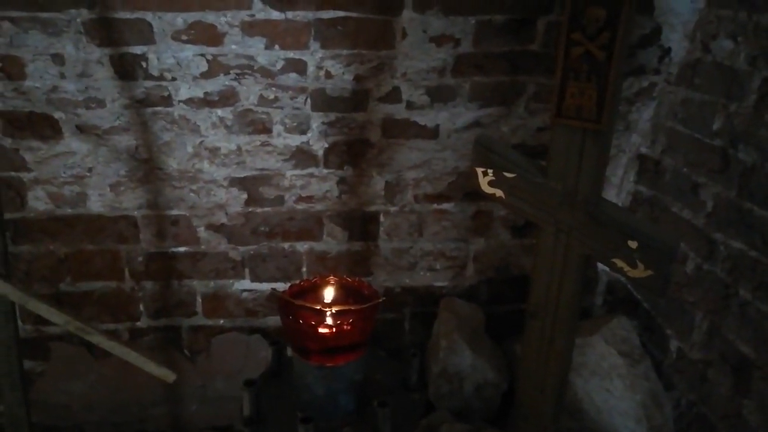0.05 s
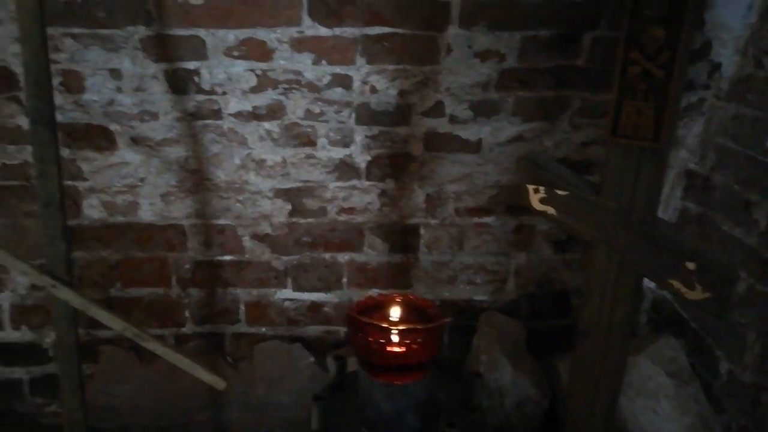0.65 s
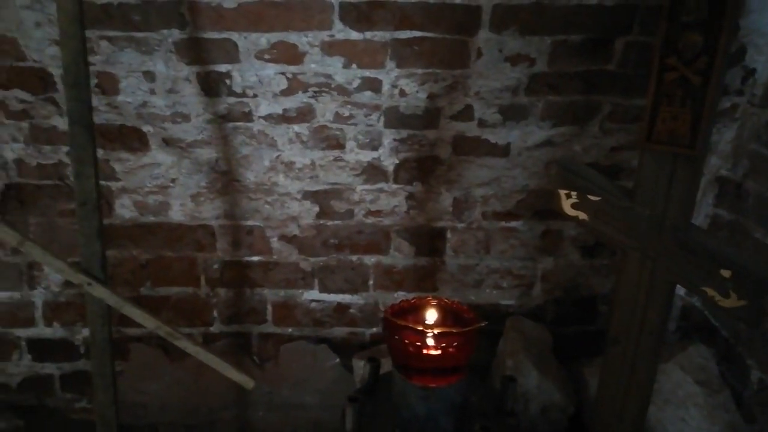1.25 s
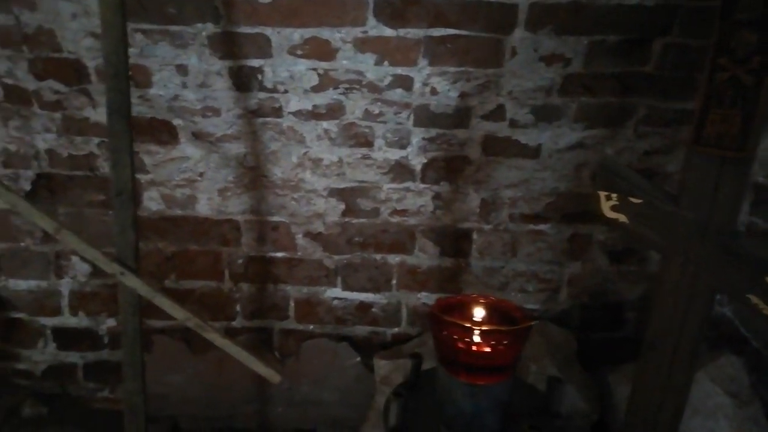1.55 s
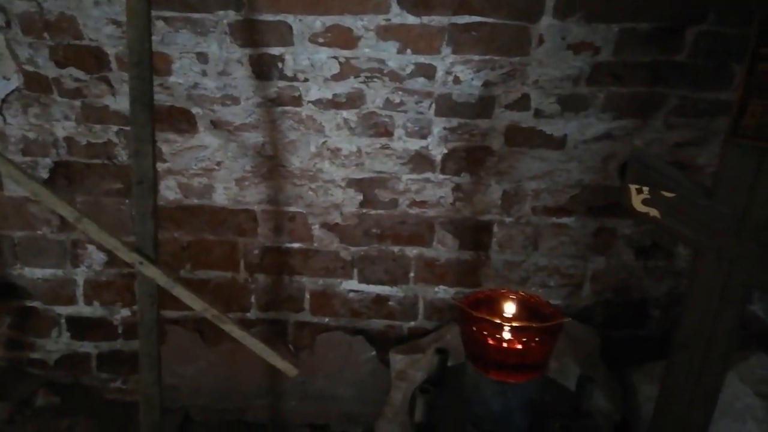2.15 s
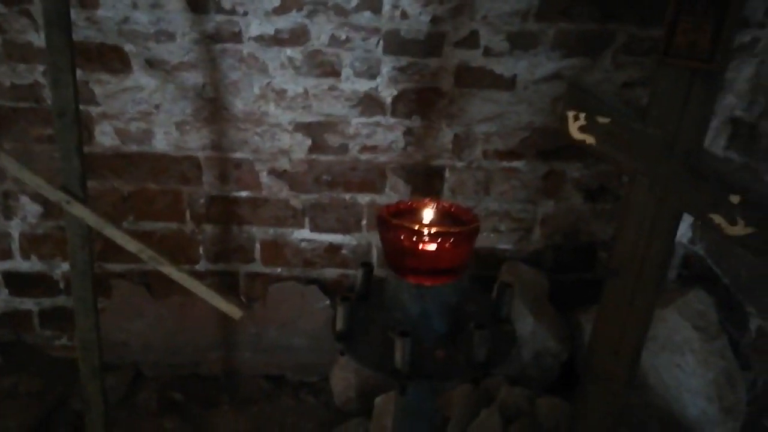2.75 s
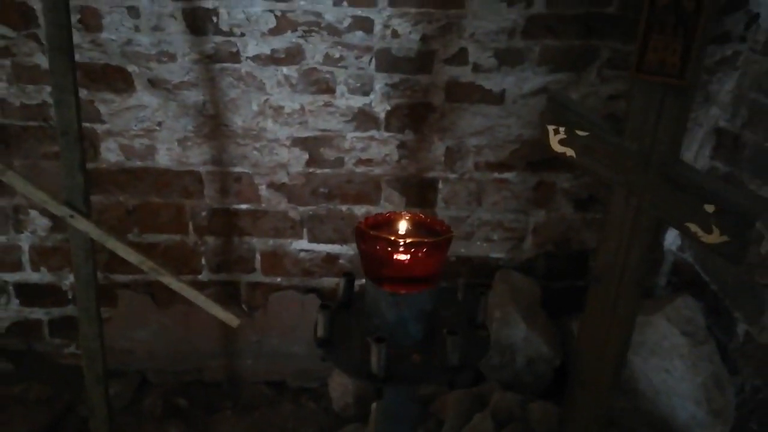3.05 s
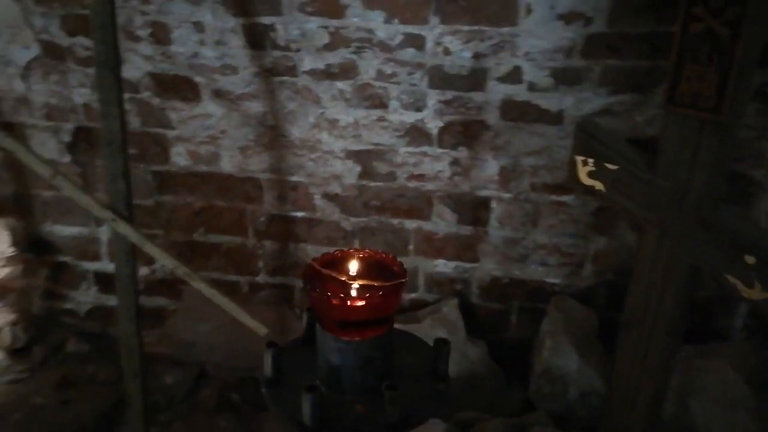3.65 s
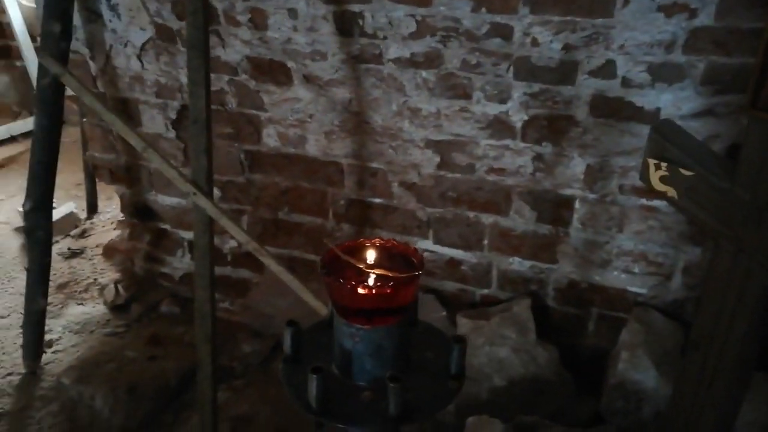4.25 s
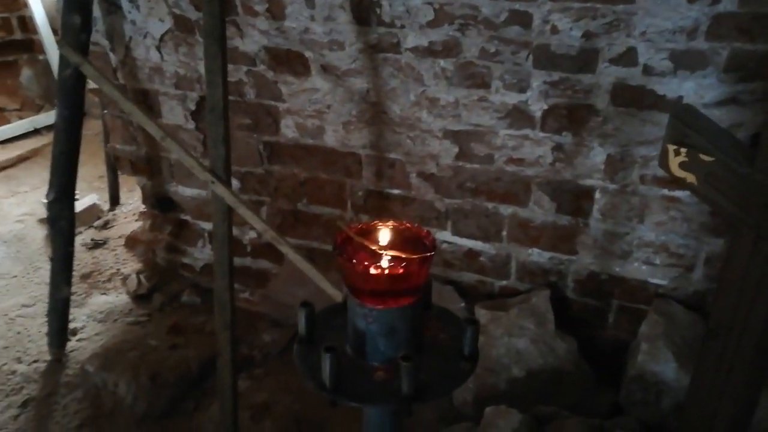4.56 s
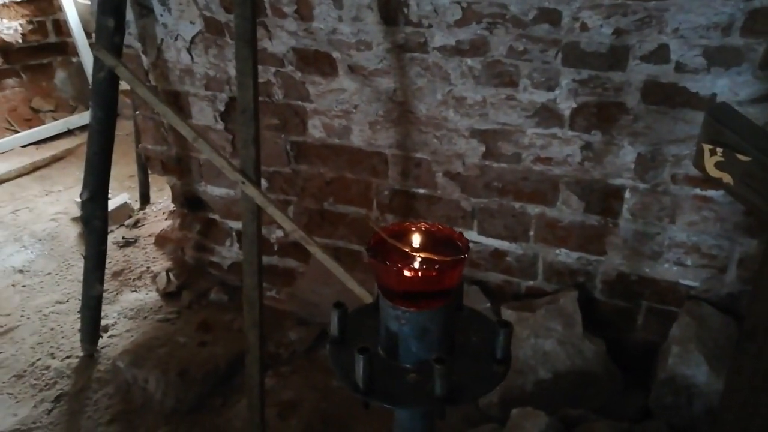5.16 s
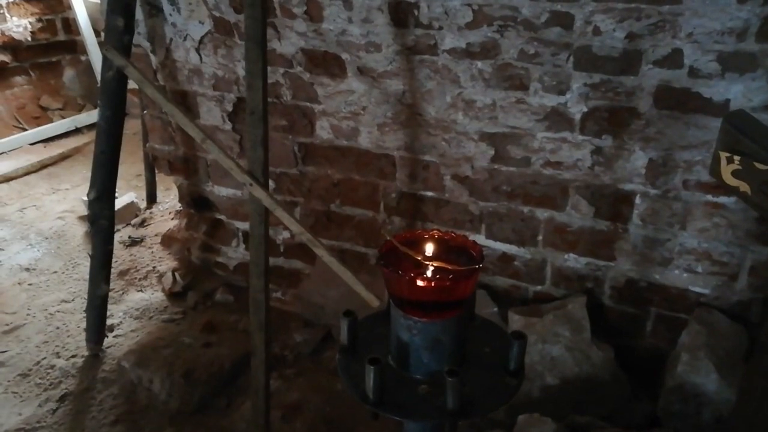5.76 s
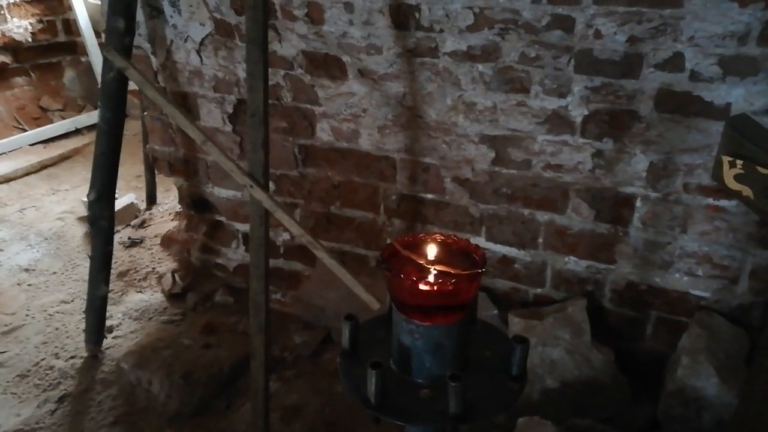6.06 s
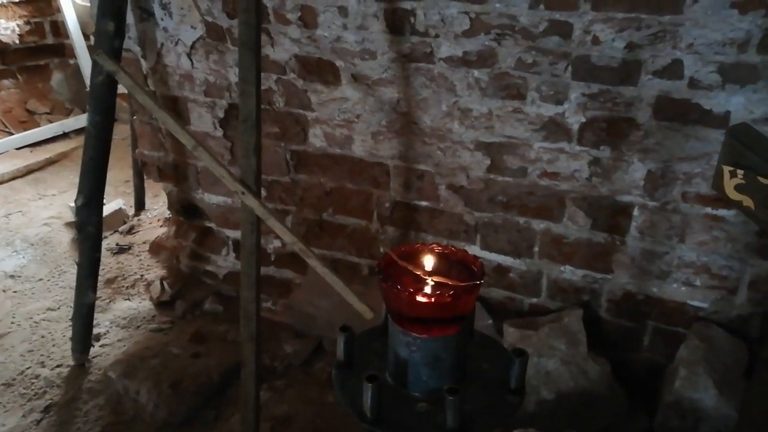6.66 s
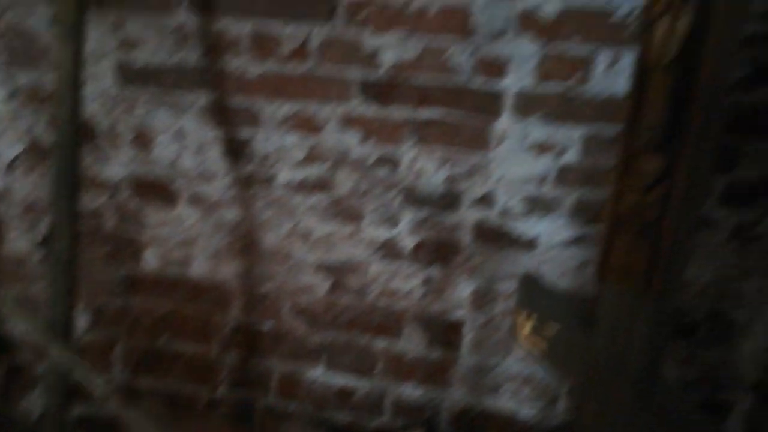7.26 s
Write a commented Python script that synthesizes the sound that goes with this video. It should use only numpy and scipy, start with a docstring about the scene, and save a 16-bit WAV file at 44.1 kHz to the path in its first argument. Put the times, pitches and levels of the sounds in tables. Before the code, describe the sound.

Close to the microphone, the damp wick of an oil lamp fries with fine, bright crackling and irregular tiny pops. A couple of soft hisses rise in the first half. Later the crackle breaks into quick clusters of ticks as the steady sizzle weakens, with one louder snap shortly before the end. The small indoor space is otherwise still, with only a faint rumble.

```python
"""A sputtering oil lamp

A small oil lamp burns in a glass cup by a brick wall. Moisture in the wick boils off: first a dense sizzle with
a thin jet of steam, then more separate sputters as the wick dries. Larger bubbles burst in sharp pops
throughout. The cup and the wall echo every tick, and a low rumble surges at the start, then murmurs faintly
underneath."""
import sys
import numpy as np
from scipy import signal
from scipy.io import wavfile
from scipy.ndimage import map_coordinates

SR = 44100
rng = np.random.default_rng(int(sys.argv[2]) if len(sys.argv) > 2 else 0)


def store_wav(level_fs):
    """Save 16-bit WAV to argv[1]."""
    pcm = np.round(np.clip(np.atleast_2d(level_fs), -1, 1) * 32767)
    wavfile.write(sys.argv[1], SR, pcm.T.astype(np.int16))


N = 322371
TIME = np.arange(N) / SR

# Levels in the tables are relative. A tick's "body" is a boost to its lower frequencies.
# steady boiling of the wick: time_s, level_db
SIZZLE_LEVEL = [(0, -46.5), (0.3, -51.0), (0.55, -47.5), (0.75, -50.5), (0.93, -50), (1.4, -50.5),
                (1.62, -47.5), (1.92, -51.5), (2.05, -48.5), (2.22, -53.5), (2.58, -52), (2.75, -52),
                (2.99, -58), (3.09, -53), (3.28, -54.5), (3.5, -55.5), (3.95, -55.5), (4.3, -53),
                (4.5, -63), (4.8, -59), (5.1, -63), (5.27, -51.5), (5.55, -57), (5.9, -55), (6.1, -59.5),
                (6.43, -53), (6.56, -56.5), (6.85, -58.5), (7.03, -57), (7.31, -58.5)]
# the largest bubbles bursting: time_s, level_db, body_db
BUBBLE_POPS = [(0.0214, -15, -6), (0.0542, -17, 0), (0.0795, -14, 6), (0.0979, -14, 5), (0.1337, -15, 9),
               (0.1697, -12.5, 5), (0.2362, -10.5, 2.5), (0.2591, -14, -5), (0.295, -15, 2),
               (0.3558, -12, -16), (0.3638, -13, -12), (0.4502, -12.5, -11), (0.471, -12.5, -2),
               (0.5288, -16, -1), (0.6179, -20, 5), (0.624, -16, -3), (0.6668, -18.5, 1),
               (0.7096, -19.5, 9.5), (0.7255, -20, 8), (0.81, -13, -2), (0.8248, -11.5, -9),
               (0.8966, -11.5, -10), (0.9107, -16, 3), (0.9168, -14, 1), (0.9388, -12, -11),
               (1.0014, -16.5, 4.5), (1.096, -17.5, 4), (1.1051, -28, 6), (1.1214, -14, -11),
               (1.1684, -18, -5), (1.1775, -21, -4), (1.1845, -24, 9), (1.2275, -24, 13), (1.3029, -22, 12),
               (1.3143, -22.5, 11), (1.403, -19, -3), (1.5121, -14.5, 5), (1.554, -18, 5),
               (1.6134, -13.5, 3), (1.742, -18, 2), (1.7535, -11, -4), (1.8799, -20.5, 12),
               (1.8948, -16.5, 4.5), (1.9216, -16.5, 4), (1.978, -11, -19), (1.9923, -13, -8),
               (2.0018, -11, -5), (2.032, -15, -15), (2.0452, -16, 6), (2.0893, -11, -11),
               (2.1052, -17, -10), (2.1543, -13, -6), (2.307, -16.5, 5), (2.3112, -16, 9.5),
               (2.402, -20, 7), (2.4795, -18, -3), (2.4932, -16.5, 2), (2.5172, -16.5, -4),
               (2.532, -19.0, 4), (2.5796, -15.0, 0), (2.599, -10.5, -4), (2.6144, -13, -4.0),
               (2.8654, -20, 11), (3.036, -17, 0), (3.051, -17, 2), (3.0616, -17, -2), (3.208, -16.5, 2.5),
               (3.483, -15, 0), (3.4892, -19.5, 2), (3.5252, -13, 1), (3.5308, -13.5, 3),
               (3.5907, -14, -4.5), (3.6135, -14, -19), (3.654, -13, -6.0), (3.6661, -17, 2),
               (3.7188, -16, -3.5), (3.8435, -14.5, -1), (3.928, -16.5, 1.5), (4.0128, -13, -9),
               (4.058, -14.5, -2), (4.1968, -16, -11), (4.212, -9.5, -8), (4.2811, -13, -3),
               (4.3153, -22, -1), (4.326, -11.5, 0.5), (4.3787, -14, -3), (4.4902, -19, -6),
               (4.5883, -11, -13), (4.6356, -11.5, -4.5), (4.6682, -9.5, -2), (4.6964, -13.5, 0.5),
               (4.7642, -17, -11), (4.9605, -19, 1), (5.0036, -16.5, -0.5), (5.0531, -18, 6),
               (5.1083, -21.5, -2), (5.256, -14, -2), (5.2905, -13, -2), (5.438, -19.5, 6),
               (5.4718, -16, -12), (5.648, -15.5, -4.5), (5.855, -16, 1.5), (5.8833, -16, 1),
               (5.905, -15, -10), (5.952, -11.5, -5.5), (6.18, -18.0, 2), (6.21, -20, 3),
               (6.2498, -21, 8.5), (6.2948, -11.5, -5.5), (6.304, -15, -10), (6.346, -19, -9),
               (6.4838, -13.5, 3), (6.6186, -21, 5.5), (6.6462, -18.5, 3), (6.6914, -3.5, 2),
               (6.7759, -18.5, 3.5), (6.8929, -11.5, 0), (7.104, -17.5, 5), (7.1169, -18.5, 5),
               (7.18, -14.5, -3.5)]
# volleys of tiny bursts: middle_s, level_db, body_db
VOLLEYS = [(0.957, -17, -3), (2.249, -25, 7), (2.546, -16, 1), (2.972, -17, 1), (3.022, -19, 0),
           (3.132, -19, -2), (3.354, -17.5, -6), (3.386, -22.5, 2.5), (3.451, -17, -0.5), (3.54, -21, -3.5),
           (3.56, -17.5, -10), (3.759, -20, -4), (3.863, -19.5, -2.5), (4.393, -15, -4.5),
           (4.425, -19, -0.5), (4.486, -19, -5), (4.512, -14, -3), (4.534, -20, -10.0), (4.565, -16.5, -6),
           (4.668, -10, -3.5), (4.697, -19, -3), (4.74, -16.5, -3.5), (4.79, -18.5, 0.5),
           (4.825, -19, -3.5), (4.897, -18.5, -4), (4.964, -18.5, -5), (5.051, -18.5, -1),
           (5.11, -22.5, -0.5), (5.14, -21, -8), (5.187, -18, -1.5), (5.292, -19.5, -10),
           (5.324, -14, -1.5), (5.359, -15.5, -3.5), (5.437, -22, 4.5), (5.48, -25, 4), (5.57, -20, 0),
           (5.682, -19, -0.5), (5.729, -17.5, -4), (5.812, -23.5, 1), (5.83, -21, 2.5), (6.003, -18.5, 0),
           (6.091, -19.5, -22), (6.18, -23.5, 2.5), (6.347, -22.5, -12), (6.409, -19, -4), (6.443, -13, -8),
           (6.579, -17.5, -16.5), (6.69, -20, 1.5), (6.731, -18, -0.5), (6.778, -17.5, -1.5),
           (6.797, -21.5, 2.5), (6.829, -16.5, -5), (6.908, -19.5, -3), (6.95, -19.5, -1.5),
           (7.004, -19.5, -5), (7.03, -22.5, -1), (7.126, -22, -4), (7.182, -19, -4), (7.24, -19.5, 1.5),
           (7.298, -22.5, 1.5)]
# high hiss (steam spurts, and a brighter top to the sizzle midway): peak_s, level_db, pitch_hz
HISS_SWELLS = [(.4, -52, 9000), (1.2, -64, 9900), (2.42, -50.5, 9000), (2.9, -64, 9500), (3.7, -64, 11800),
               (4.25, -63, 11700), (7.2, -64, 9500)]
# faint whistles of the steam: middle_s, level_db, half_length_s
STEAM_WHISTLES = [(2.07, -64.5, .08), (2.56, -62, .08)]
# tone of a tick leaving the cup, from the wet wick and the dry one: frequency_hz, level_db
WET_TONE = [(150, -9), (550, -11), (900, -7.5), (2750, -3), (3300, -4.5), (4900, -6.5), (5700, -2.5),
            (6450, 1.5), (7400, 4), (8200, -3), (9200, 4), (10400, 4), (11500, -2), (12900, -11.5),
            (15500, -10.5)]
DRY_TONE = [(150, -13), (600, -15.5), (1100, -9), (2300, -6.5), (3300, -9.5), (4900, -11), (5700, -7.5),
            (6400, -3), (8400, -3), (10500, 0), (11700, -5.5), (13000, -17.5), (15500, -15)]
# the highest treble of the ticks rises and falls: time_s, gain_db
TICK_EDGE = [(0, -5), (.6, -2), (2.6, 0), (3.3, -0.5), (3.55, 0), (4.4, 1.5), (4.7, -0.5), (5.05, 3),
             (5.3, -1.5), (5.9, 2.5), (6.7, -1.5), (7.31, -2.5)]
# a narrow, high ring in the sizzle: time_s, gain_db
HIGH_RING = [(0, -28), (.5, -22), (.7, 0), (.9, -16), (1.5, -10), (2.4, -14.5), (4.0, -18), (4.27, 2),
             (4.55, -20), (6, -16.5), (6.45, -2.5), (7.31, -15.5)]
# notes at which the air in the cup and its corner rings: pitch_hz, width_hz, gain_db
CUP_NOTES = [(650, 53, -7), (1072, 23, 0.5), (1770, 21, 0), (2780, 280, -8), (3820, 660, -7)]
# where the lamp lies as the listener sways: time_s, rightward_degrees
LAMP_DIRECTION = [(0, -9), (.4, -7.5), (1.2, -1), (2.05, 4), (3.8, -8), (5.2, -3), (6.9, -1.5), (7.2, -8)]
# tone of the quiet air and of the low rumble: frequency_hz, level_db
AIR_TONE = [(28, 0), (48, -3), (66, -4.5), (95, -11), (140, -2), (210, -6), (320, -9), (500, -17.5),
            (1000, -19.5), (4000, -20), (16000, -26.5)]
RUMBLE_TONE = [(12, 3), (26, 1.5), (44, 7), (65, -28), (95, -15), (140, -8), (280, -20.5), (500, -46.5),
               (1500, -29.5)]
# surges of the rumble: peak_s, level_db
RUMBLE_SURGES = [(.09, -43.5), (.28, -51.5), (.7, -61), (1.58, -65), (4.56, -65.5), (4.83, -64),
                 (5.35, -69), (6.07, -62.5)]
# swells of a faint, distant hum: peak_s, level_db, pitch_hz, half_length_s
HUM_SWELLS = [(0.127, -64, 283, 0.16), (3.122, -70.5, 235, 0.16), (3.41, -68, 190, 0.11),
              (4.023, -67.5, 284, 0.2), (4.38, -72, 287, 0.24)]


def amp(db):
    """Turns decibels into a number to multiply by."""
    return 10 ** (np.asarray(db) / 20)


def unit(x):
    """Scales a signal to an average power of one."""
    return x / np.sqrt(np.mean(x ** 2) + 1e-20)


def curve(rows, column=1):
    """Joins the points of a time table with straight lines, one value per sample."""
    rows = np.array(rows)
    return np.interp(TIME, rows[:, 0], rows[:, column])


def wander(per_s):
    """A smooth random drift through per_s points each second."""
    points = rng.standard_normal(N // 50)
    return unit(map_coordinates(points, [TIME * per_s], order=2, mode="mirror"))


def swells(rows, rise_s, fall_s):
    """A loudness that grows towards each row's time and level, then dies away."""
    peaks = (amp(db) * np.exp(-np.maximum((s - TIME) / rise_s, (TIME - s) / fall_s))
             for s, db, *_ in rows)
    return np.sqrt(sum(peak ** 2 for peak in peaks))


def place(times_s, sizes):
    """Puts ticks of the given sizes at the given times."""
    return np.bincount(np.maximum(times_s * SR, 0).astype(int).ravel(), sizes.ravel(), N)[:N]


def passband(order, hz, kind):
    """A filter that keeps the lows, the highs or a band; a higher order cuts more steeply."""
    return signal.butter(order, hz, kind, fs=SR, output="sos")


def colour(x, tone, size=4096):
    """Shapes a sound with a tone table, using a filter that rings only after each tick."""
    hz, db = np.transpose(tone)
    log_hz = np.log(abs(np.fft.fftfreq(size, 1 / SR)) + 1)
    log_gain = np.log(amp(np.interp(log_hz, np.log(hz), db)))
    taps = np.fft.ifft(np.exp(np.conj(signal.hilbert(log_gain)))).real[:size // 2]
    return signal.oaconvolve(x, taps / np.linalg.norm(taps))[:N]


def resonate(x, hz, width_hz):
    """Keeps a narrow band that rings around a steady or moving pitch."""
    turn = np.exp(2j * np.pi * np.cumsum(hz * np.ones(N)) / SR)
    decay = np.exp(-np.pi * width_hz / SR)
    return 2 * (turn * signal.lfilter([1 - decay], [1, -decay], x / turn + 1e-18)).real


def narrow_noise(hz, width_hz):
    """Noise gathered around one pitch."""
    return unit(resonate(resonate(rng.standard_normal(N), hz, width_hz), hz, width_hz))


def dryness(start_s=1.41, length_s=2.6):
    """How far the wick has dried at each moment, from 0 to 1."""
    return np.clip((TIME - start_s) / length_s, 0, 1)


def drying_gain(wet_db, dry_db):
    """A gain that slides from its wet value to its dry one."""
    return amp(wet_db + (dry_db - wet_db) * dryness())


def sizzle(fine_per_s=7000, larger_per_s=420, spread_db=18, variety_db=2.0, clumps_per_s=70):
    """Tiny bubbles fry among larger ones, clumping as the wick dries; gives ticks and their body."""
    fine = rng.standard_normal(N) * (rng.random(N) < fine_per_s / SR)
    larger = amp(spread_db * rng.random(N)) * (rng.random(N) < larger_per_s / SR)
    fine = unit(fine) * drying_gain(wet_db=-3.5, dry_db=-7.0)
    larger = unit(larger) * drying_gain(wet_db=0.0, dry_db=-0.5)
    clumps = drying_gain(wet_db=-1.5, dry_db=4.5) ** np.tanh(wander(clumps_per_s))
    ticks = (fine + larger) * amp(curve(SIZZLE_LEVEL)) * clumps
    variety = unit(amp(variety_db * rng.standard_normal(N)))
    body = ticks * variety * drying_gain(wet_db=1.5, dry_db=-1.5)  # a wet wick makes bigger bubbles
    return np.array([ticks, body])


def room(air_db=-65, stereo_above_hz=480):
    """Quiet air, a low rumble that surges loudest at the start, and a distant hum; the bass is alike on both
    sides."""
    air, side, rumble = rng.standard_normal((3, N))
    side = signal.sosfilt(passband(1, stereo_above_hz, "high"), colour(side, AIR_TONE))
    rumble = colour(rumble, RUMBLE_TONE, size=16384) * swells(RUMBLE_SURGES, rise_s=0.1, fall_s=0.15)
    middle = amp(air_db) * colour(air, AIR_TONE, size=16384) + rumble + distant_hum()
    return middle + amp(air_db) * np.array([side, -side])


def distant_hum(width_hz=65):
    """Soft, rounded swells of low noise, each around its own pitch."""
    return sum(narrow_noise(hz, width_hz) * amp(db) * np.exp(-((TIME - s) / half_length_s) ** 2)
               for s, db, hz, half_length_s in HUM_SWELLS)


def pops(gain_db=-5.0, extra_body_db=-0.33, thin_hz=1250, tear_db=-6.0, tear_s=.0007):
    """A large bubble's film tears, then it bursts in a thin snap; gives ticks and their body."""
    time_s, level_db, body_db = np.transpose(BUBBLE_POPS)
    lead, sign = rng.random((len(time_s), 2)).T
    when = np.array([time_s, time_s - tear_s * lead])
    snap = amp(level_db + gain_db)
    tear = snap * amp(tear_db) * np.sign(sign - .5)
    sizes = np.array([snap, tear])
    ticks = place(when, sizes)
    body = place(when, sizes * amp(body_db + extra_body_db))
    return signal.sosfilt(passband(1, thin_hz, "high"), [ticks, body])


def high_hiss(width_hz=1400, waver_hz=350, waver_per_s=28):
    """Swells of high, wavering hiss: steam spurts, and a brighter top to the sizzle midway."""
    pitch_hz = curve(HISS_SWELLS, column=2) + waver_hz * wander(waver_per_s)
    return narrow_noise(pitch_hz, width_hz) * swells(HISS_SWELLS, rise_s=0.096, fall_s=0.12)


def sputters(base_span_s=.0027, haste_per_db=.055, spread_db=4, gain_db=-2.0, count=24):
    """Volleys of tiny bursts thicken fast and then thin out; gives ticks and their body."""
    middle_s, level_db, body_db = np.transpose(VOLLEYS)[:, :, None]
    grow, burst, size, sign, fullness = rng.random((len(middle_s), 5, count)).transpose(1, 0, 2)
    excess_db = np.maximum(level_db - level_db.mean(), 0)
    span_s = base_span_s * np.exp(-haste_per_db * excess_db)  # strong volleys are quicker
    when = middle_s - span_s * (np.log(grow * burst) + 1.45)  # two random waits, roughly centred
    sizes = amp(spread_db * np.minimum(-np.log(size), 3)) * np.sign(sign - .5)
    sizes *= amp(level_db + gain_db) / np.linalg.norm(sizes, axis=1, keepdims=True)
    variety_db = 6 * fullness - 4.1
    return np.array([place(when, sizes), place(when, sizes * amp(body_db + variety_db))])


def steam_whistle(pitch_hz=2580, quiver_hz=16, quiver_per_s=140):
    """Twice the steam holds a thin, quivering note below its hiss."""
    hz = pitch_hz + quiver_hz * wander(quiver_per_s)
    note = np.sin(2 * np.pi * np.cumsum(hz) / SR)
    loudness = sum(amp(db) * np.exp(-((TIME - s) / half_length_s) ** 4)
                   for s, db, half_length_s in STEAM_WHISTLES)
    return unit(note) * loudness


def burning_wick(body_below_hz=4600, edge_above_hz=11600, ring_hz=6500, ring_width_hz=330):
    """Bursts and hiss; later the ticks change tone, and cup and corner ring as the listener nears."""
    ticks, body = sizzle() + sputters() + pops()
    # the body takes the place of each tick's lower frequencies
    ticks = ticks + signal.sosfiltfilt(passband(2, body_below_hz, "low"), body - ticks)
    edge = signal.sosfiltfilt(passband(6, edge_above_hz, "high"), ticks)
    ticks = ticks + (amp(curve(TICK_EDGE)) - 1) * edge
    wet_ticks = colour(ticks * (1 - dryness()), WET_TONE)
    dry_ticks = colour(ticks * dryness(), DRY_TONE)
    crackle = wet_ticks + dry_ticks
    high_ring = amp(curve(HIGH_RING)) * resonate(crackle, ring_hz, ring_width_hz)
    cup_ring = sum(amp(db) * resonate(dry_ticks, hz, width_hz) for hz, width_hz, db in CUP_NOTES)
    return crackle + high_ring + cup_ring + high_hiss() + steam_whistle()


def direct_sound(x, spacing_m=0.24, sound_m_per_s=343):
    """Sound straight from the lamp reaches the nearer of two microphones first."""
    lag_samples = spacing_m * np.sin(np.radians(curve(LAMP_DIRECTION))) / sound_m_per_s * SR
    return np.array([map_coordinates(x, [np.arange(N) + side * lag_samples / 2], order=5)
                     for side in (-1, 1)])


def echoes(x, start_s, fade_s, spots=8):
    """Scattered echoes fall 60 dB in fade_s; their pattern shifts as bursts hop about the wick."""
    t = np.arange(SR // 4) / SR
    position = spots * (1 + wander(per_s=10) / 2) % spots
    out = np.zeros((2, N))
    for spot in range(spots):
        pattern = rng.standard_normal((2, len(t))) * (t > start_s) * amp(-60 * t / fade_s)
        pattern /= np.linalg.norm(pattern, axis=1, keepdims=True)
        distance = abs((position - spot + spots / 2) % spots - spots / 2)  # the spots form a circle
        share = np.cos(np.pi / 2 * np.minimum(distance, 1))
        out += signal.oaconvolve((x * share)[None], pattern, axes=1)[:, :N]
    return out


def scene(cup_db=-7, wall_db=-6, far_db=-14, pan_db_per_degree=0.21):
    """The lamp and its echoes from the cup, the close bricks and the room, over a faint rumble."""
    lamp = burning_wick()
    cup = amp(cup_db) * echoes(lamp, start_s=.0001, fade_s=0.0047)
    wall = amp(wall_db) * echoes(lamp, start_s=.002, fade_s=0.036)
    far = amp(far_db) * echoes(lamp, start_s=.015, fade_s=0.13)
    balance = amp(np.array([[-.5], [.5]]) * pan_db_per_degree * curve(LAMP_DIRECTION))
    return balance * (direct_sound(lamp) + cup + wall + far) + room()


def record(dry, middle_hz=(450, 5000), tilt_db=1.5, highest_hz=15950):
    """The middle range is louder on the right, softer on the left; the very top is cut away."""
    middle = signal.sosfiltfilt(passband(1, middle_hz, "band"), dry)
    sound = dry + middle * (amp([[-tilt_db], [tilt_db]]) - 1)
    top_cut = signal.firwin(511, highest_hz, window=("kaiser", 9), fs=SR)
    return signal.oaconvolve(sound, top_cut[None], "same")


dry = scene()
out = record(dry)
store_wav(out)
```